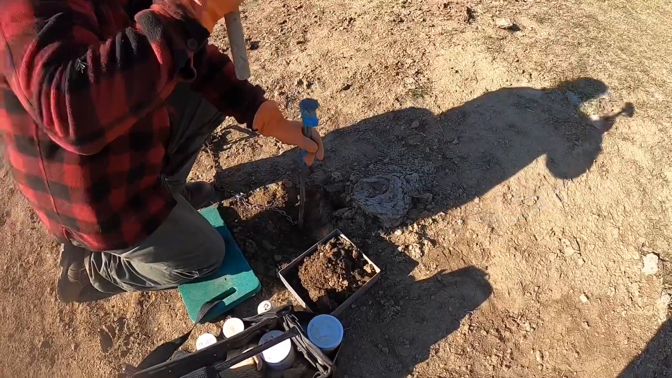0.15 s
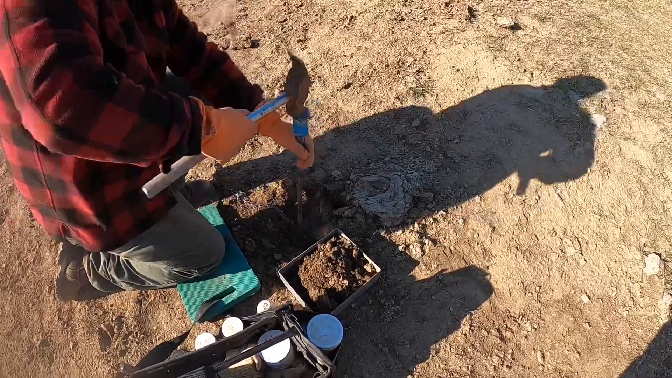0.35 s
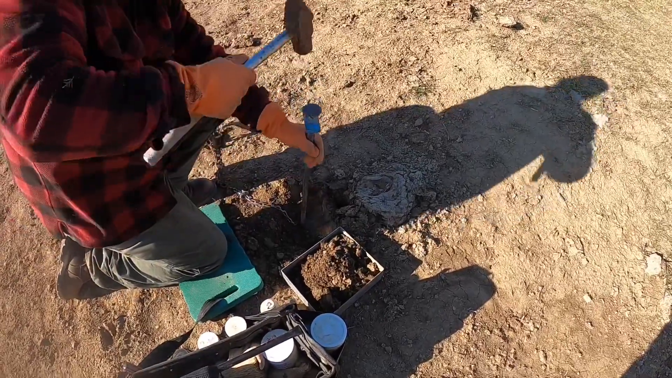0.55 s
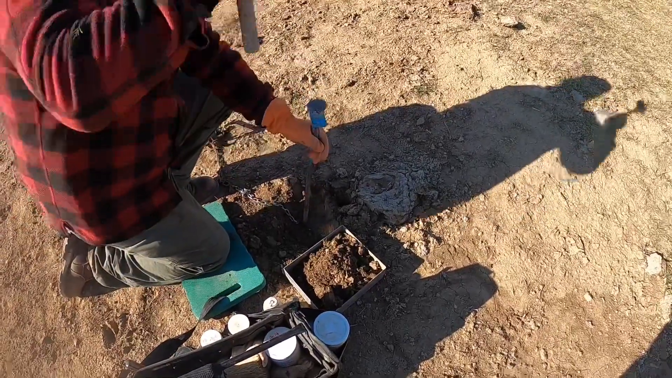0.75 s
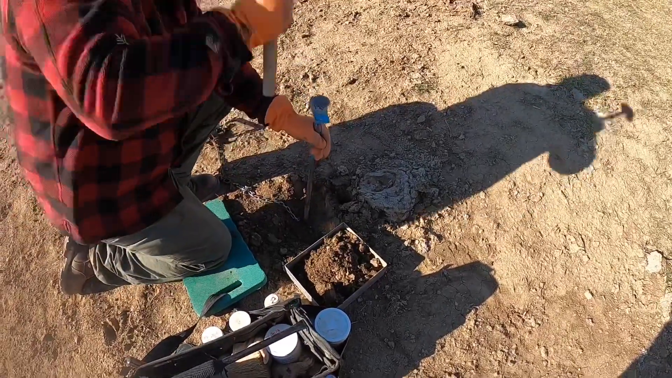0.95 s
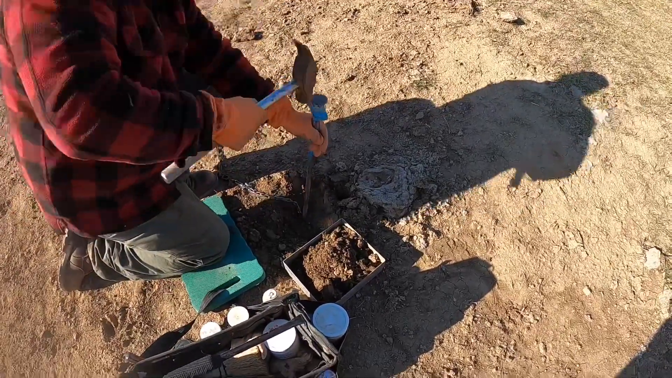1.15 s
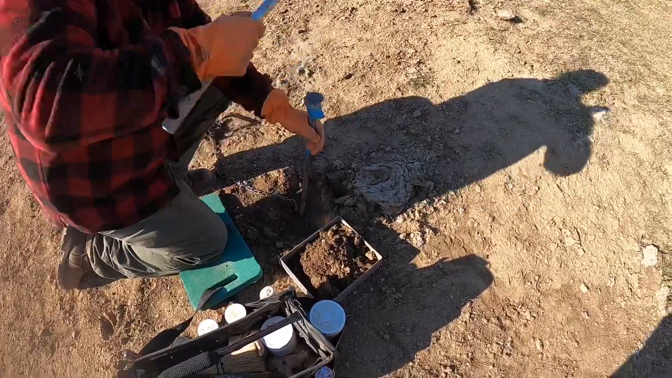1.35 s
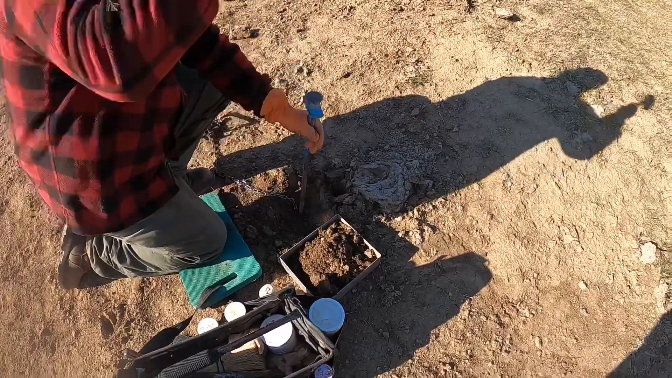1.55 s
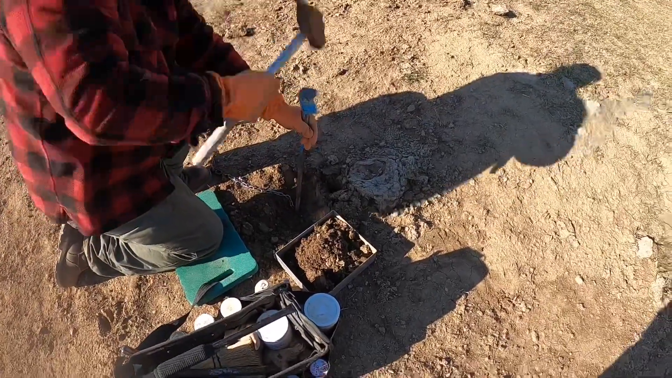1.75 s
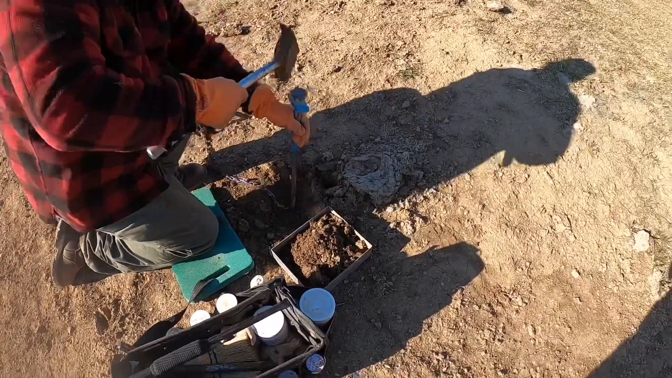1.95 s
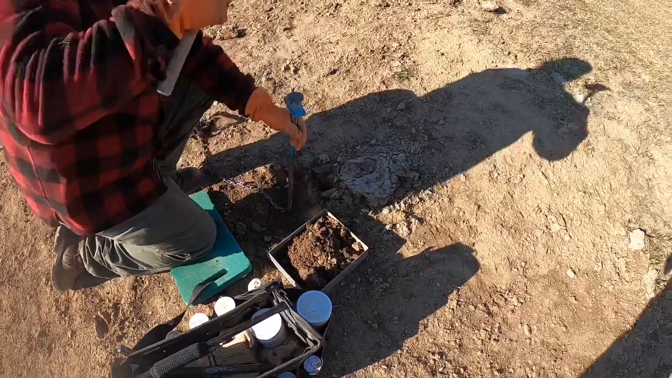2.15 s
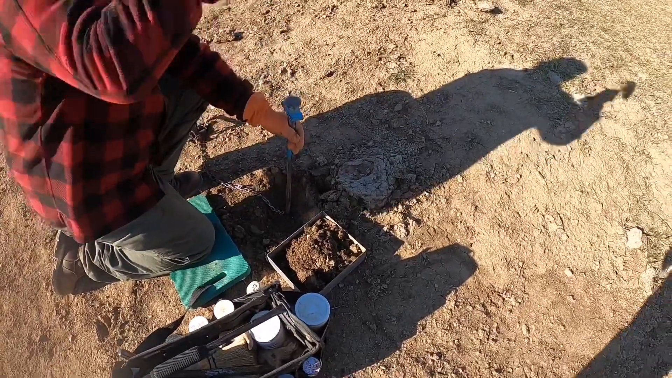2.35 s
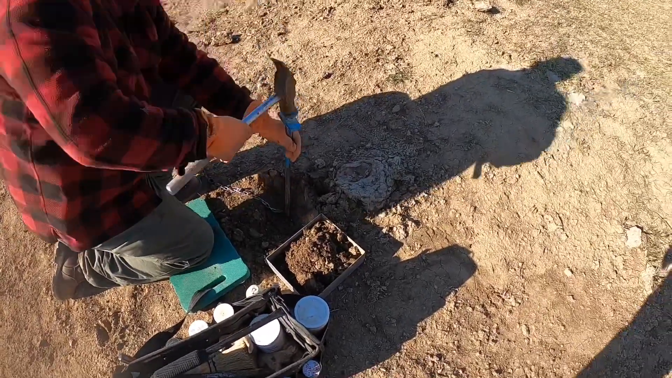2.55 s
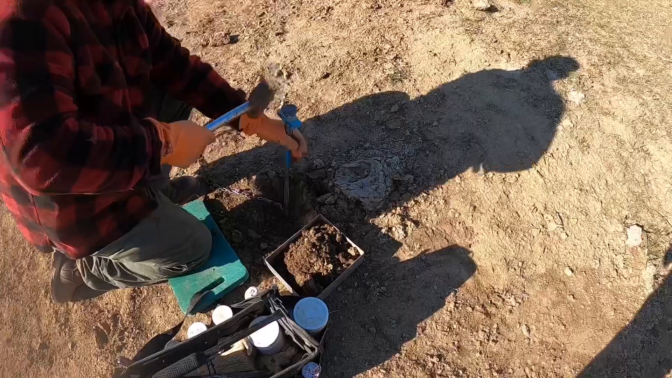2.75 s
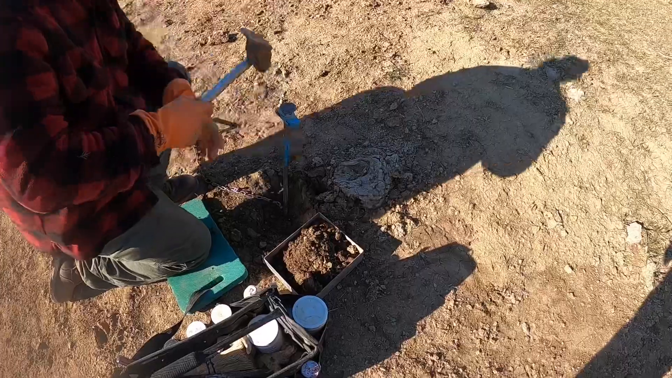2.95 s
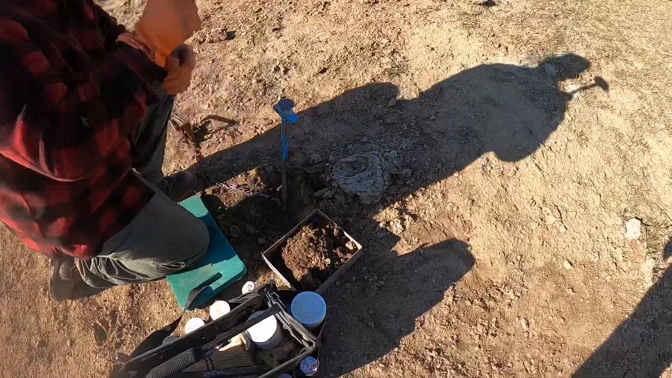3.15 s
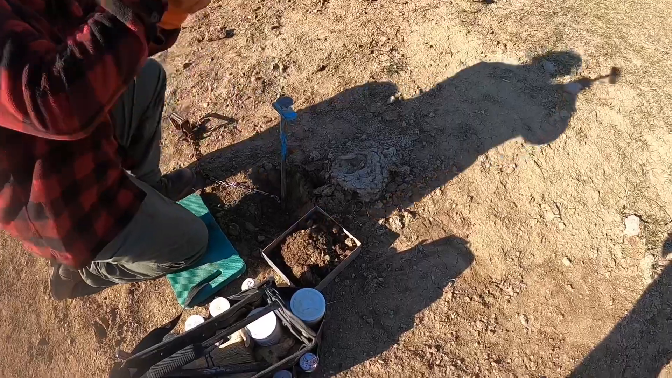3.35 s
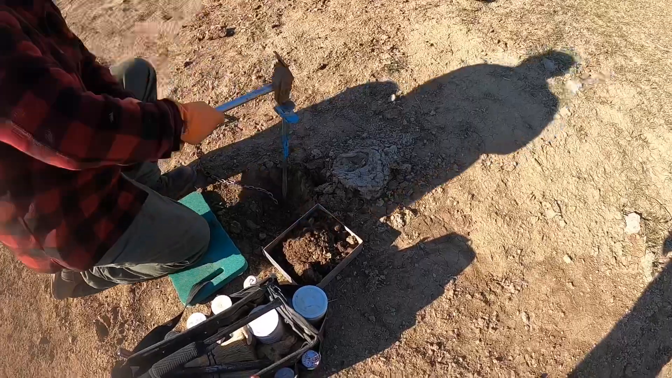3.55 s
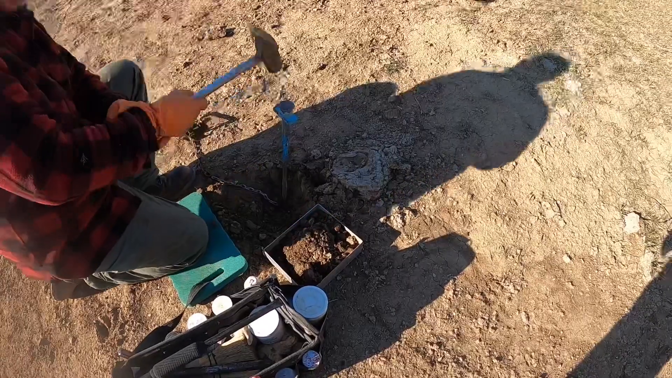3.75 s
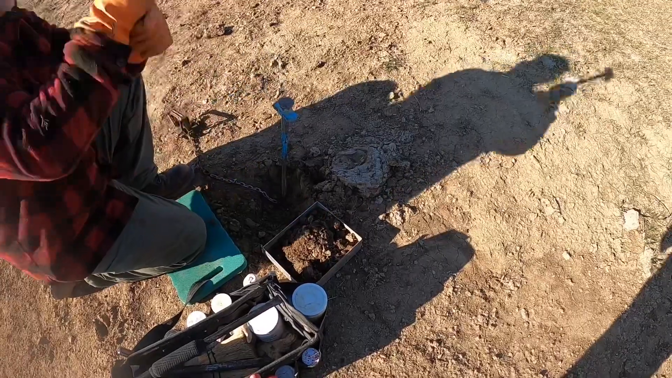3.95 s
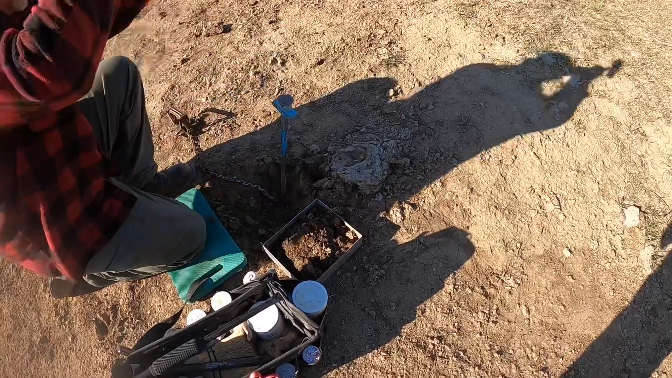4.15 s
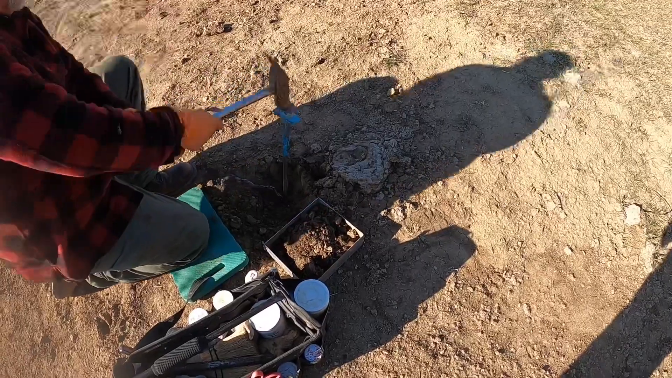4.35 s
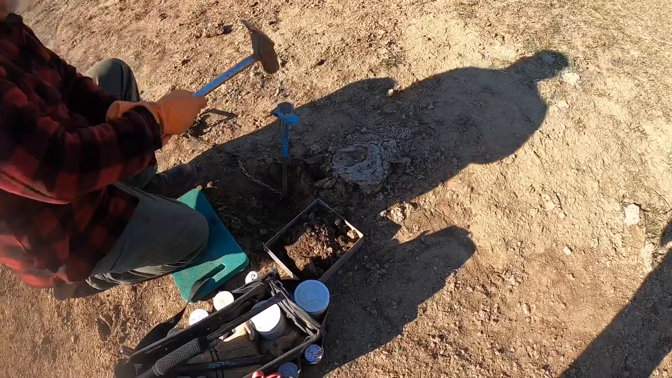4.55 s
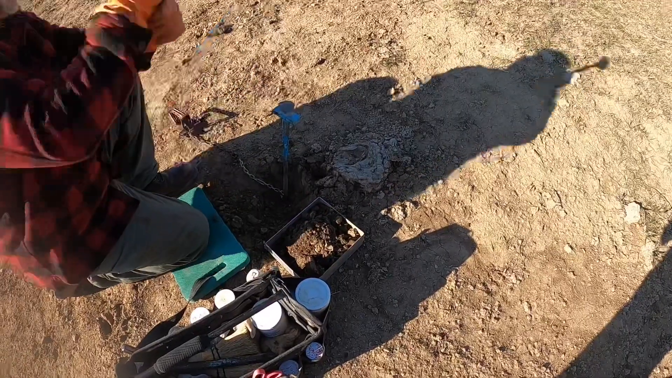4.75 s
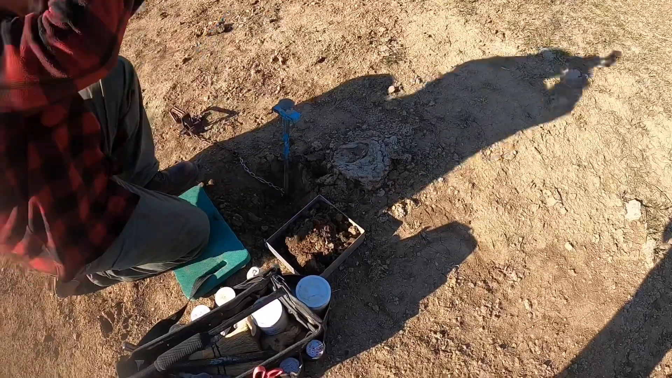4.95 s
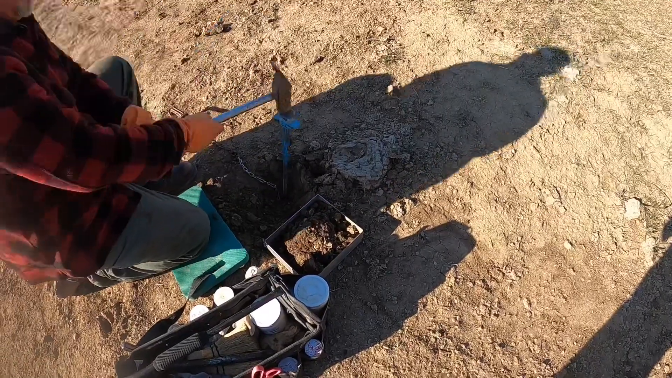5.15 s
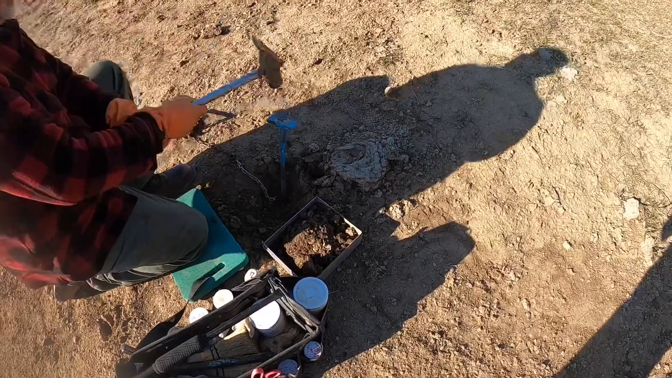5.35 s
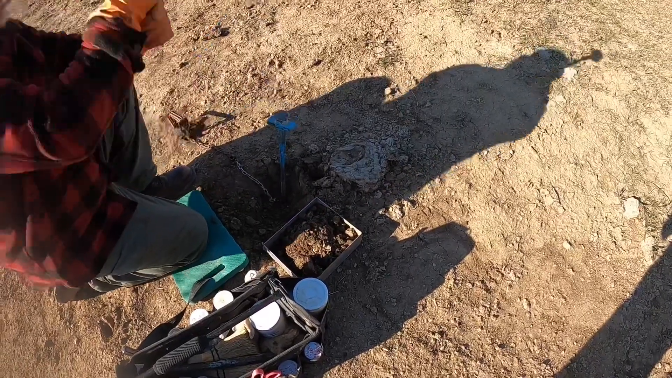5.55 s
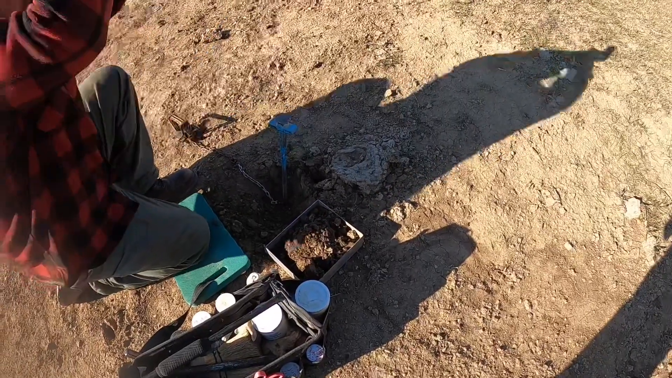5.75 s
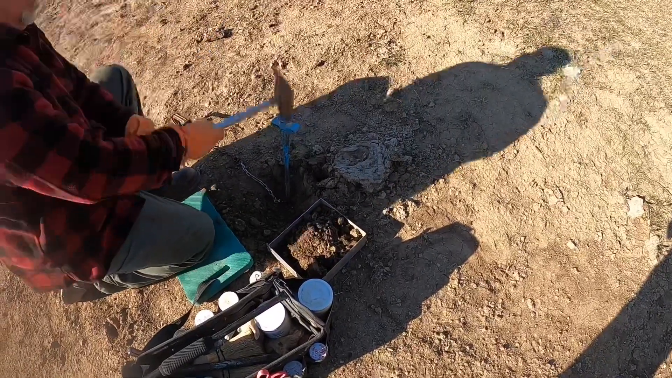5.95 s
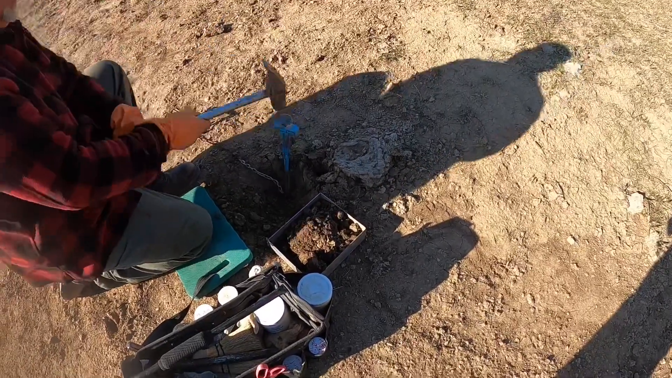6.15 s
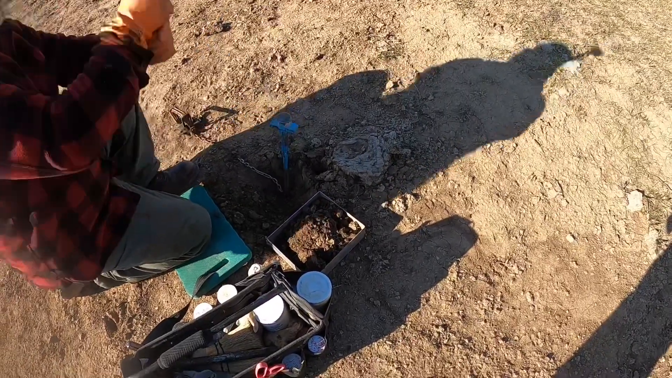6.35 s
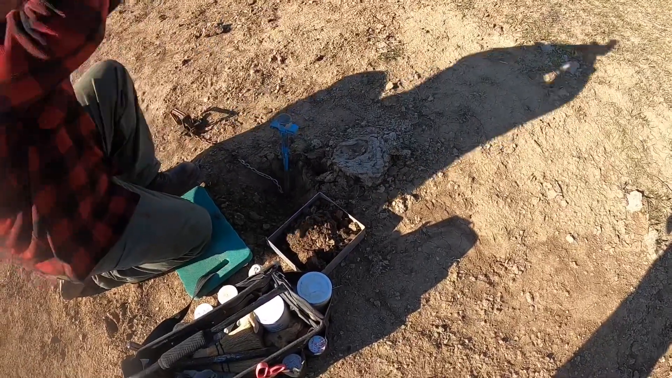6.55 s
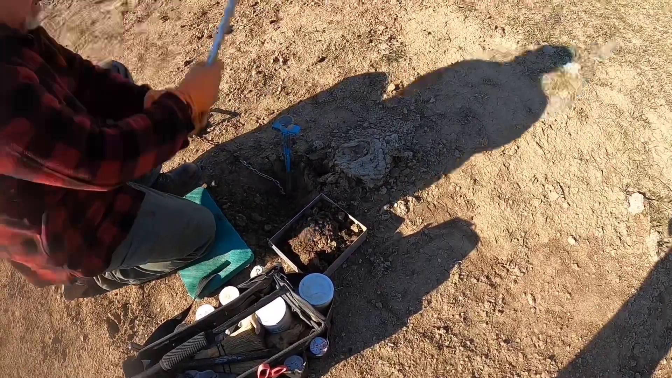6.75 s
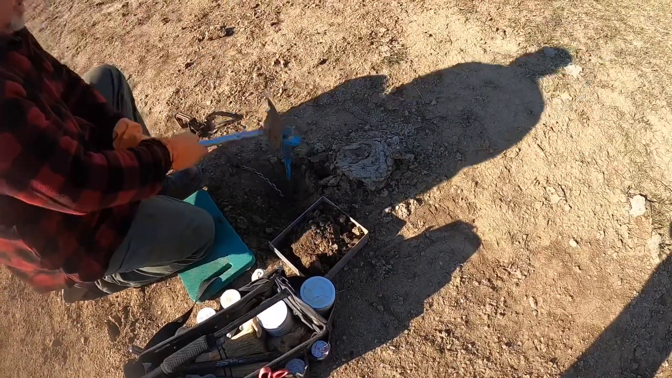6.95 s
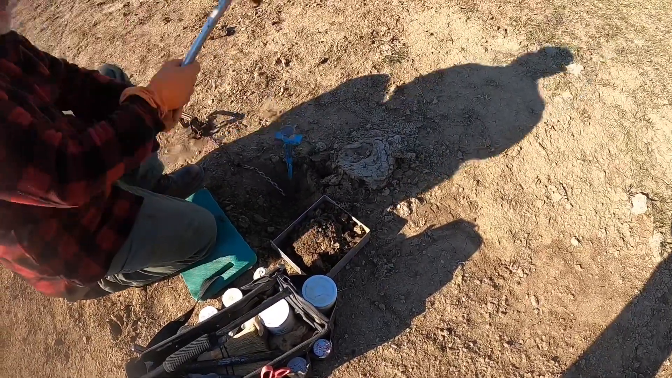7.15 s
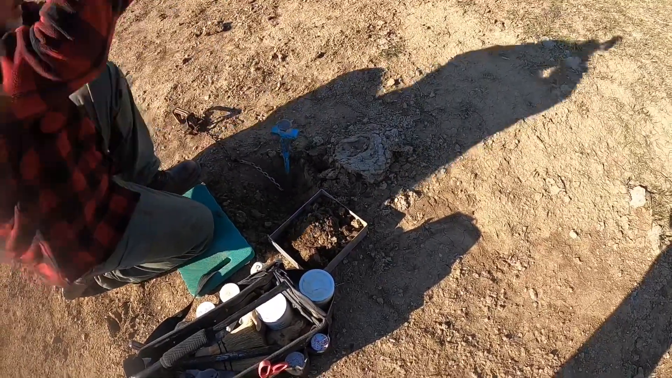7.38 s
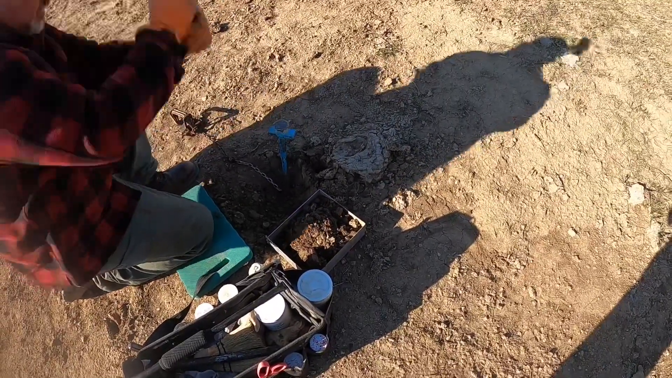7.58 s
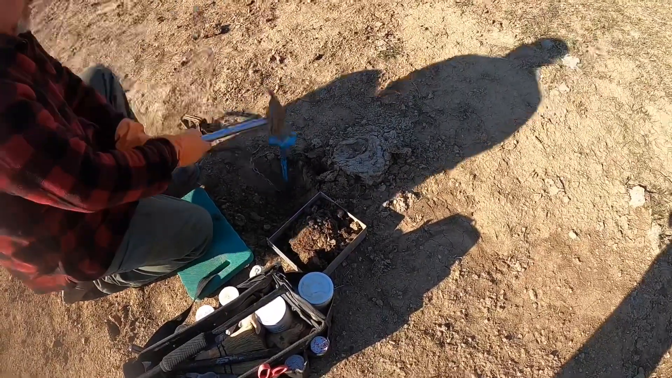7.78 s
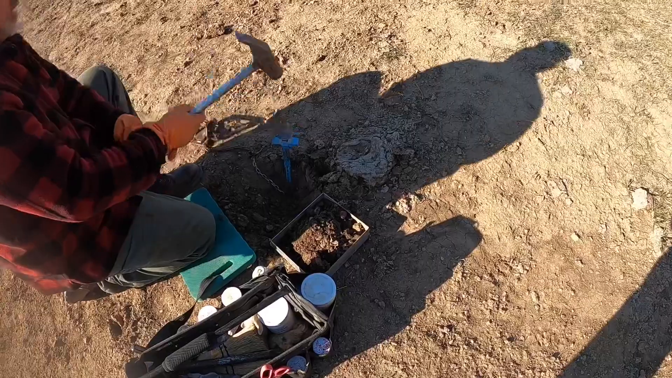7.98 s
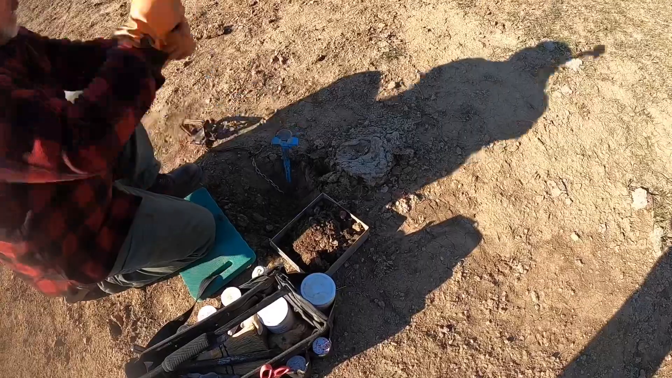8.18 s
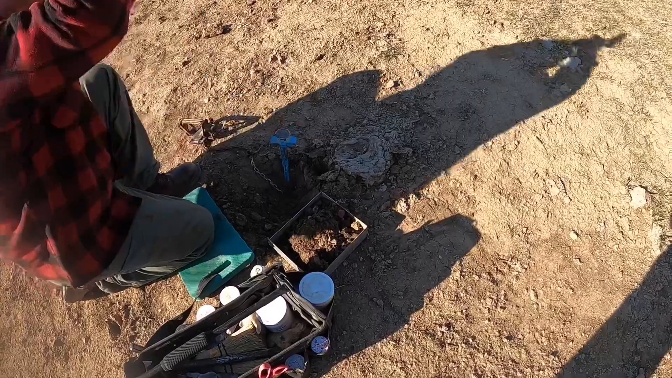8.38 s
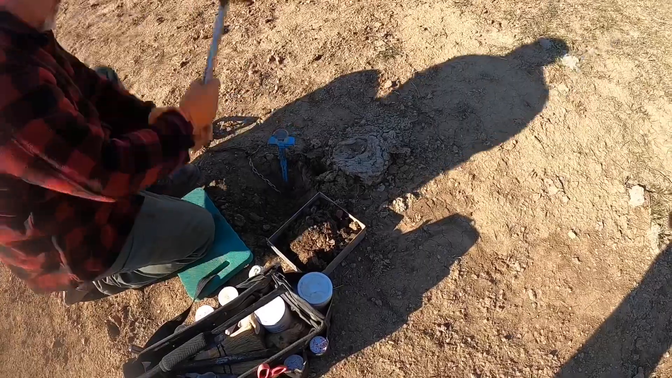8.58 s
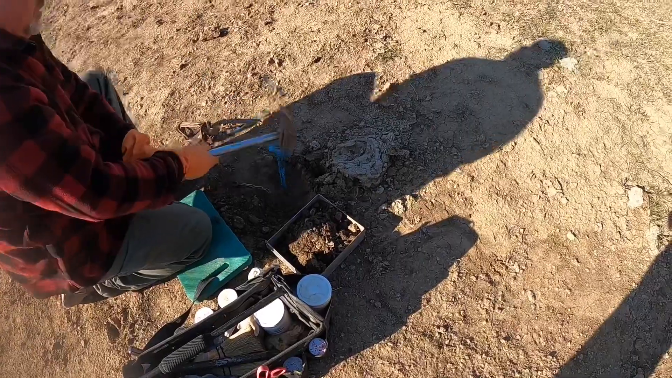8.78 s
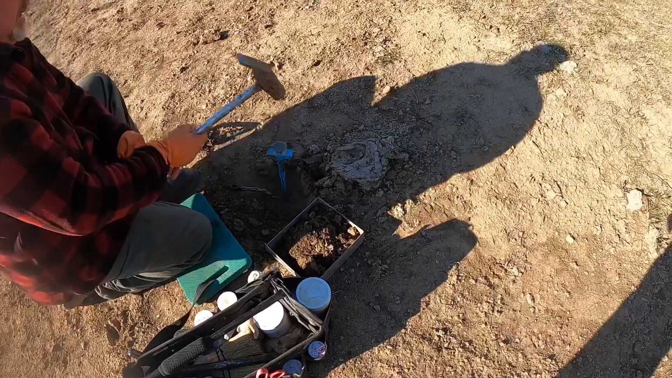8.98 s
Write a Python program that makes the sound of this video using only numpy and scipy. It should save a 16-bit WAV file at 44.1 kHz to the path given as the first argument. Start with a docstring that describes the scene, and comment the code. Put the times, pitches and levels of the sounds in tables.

```python
"""A steel hammer drives a metal stake into dry ground on a windy day, heard by one close microphone.
From the start, wind hisses in far grass and its eddies rumble and buffet on the microphone; sleeves rustle.
A short fizz swells just before each crack. At each of eleven blows steel cracks on steel and excites the
modes of stake and hammer head. Echoes return from far objects, the gain ducks the treble, and grit falls
back while the head sings on at a high pitch. In the later blows the ground damps the stake much sooner."""
import sys
import numpy as np
from scipy import signal
from scipy.fft import rfft, irfft
from scipy.io import wavfile
from scipy.ndimage import uniform_filter1d

SR = 44100
rng = np.random.default_rng(int(sys.argv[2]) if len(sys.argv) > 2 else 0)


def dump(signal):
    """Clip the signal to [-1, 1] and save it as 16-bit WAV at the path in sys.argv[1]."""
    limited = np.clip(np.atleast_2d(signal).T, -1, 1)
    pcm = np.round(limited * 32767).astype(np.int16)
    wavfile.write(sys.argv[1], SR, pcm)


N = 397782

# Noise spectra of wind in grass, cloth and four kinds of eddy noise: frequency_hz, relative_density_db
GRASS_SPECTRUM = [(530, -32.5), (900, -3.5), (1520, -19), (2210, -6.5), (3370, -10), (6340, -18.5),
                  (8190, -22.5), (9500, -49.5), (12400, -75.5), (20900, -120)]
CLOTH_SPECTRUM = [(800, -10.5), (1500, 0), (3000, 2.5), (5000, -3), (8000, -13.5), (9500, -17),
                  (10500, -58.5)]
RUMBLE_SPECTRUM = [(8.8, -40.5), (15, -8), (43, 3), (75, 3.5), (203, -6.5), (300, -19.5), (390, -39.5),
                   (660, -120)]
FLUTTER_SPECTRUM = [(60, -16), (130, -1.5), (250, -3.5), (420, -10), (800, -29), (1600, -79.5)]
BUFFET_SPECTRUM = [(200, -8.5), (420, -4.5), (800, -8.5), (1500, -23), (3000, -57.5), (5000, -73.5)]
TEAR_SPECTRUM = [(500, -11), (1000, -5), (2000, -10.5), (3500, -28.5), (5000, -44), (7000, -72.5)]
# Sleeves brushing: centre_s, half_width_s, level_db
SLEEVE_BRUSHES = [(0.16, 0.058, -58.5), (0.87, .02, -55.5), (0.945, 0.016, -57), (1.654, 0.11, -56),
                  (3.166, 0.032, -56.5), (3.3, 0.04, -59.5), (3.466, 0.047, -58.5), (4.084, 0.083, -65),
                  (4.95, 0.14, -73), (5.622, 0.059, -60), (6.63, .06, -63), (7.497, 0.035, -71.5),
                  (8.1, 0.046, -67)]
# Grit and clods falling back: start_s, level_db, pitch_hz
GRIT_FALLS = [(1.135, -50, 1520), (1.14, -52, 1990), (1.388, -66, 3330), (2.683, -58, 1730),
              (3.65, -45, 1320), (4.45, -52, 1095), (4.494, -52, 2020), (5.224, -40, 1520),
              (5.82, -63, 3000), (6.064, -46, 1470), (6.10, -52, 1780), (6.888, -49.5, 1600),
              (7.78, -54, 1700), (7.815, -49.5, 2200), (7.978, -60.5, 2720), (8.084, -58.5, 3750),
              (8.72, -51, 1500)]
# Course of the wind's rumble on the microphone: time_s, level_db
RUMBLE_LEVELS = [(0.0, -12.5), (0.15, -23.5), (1.0, -20), (1.36, -29), (1.5, -17), (2.96, -32.5),
                 (3.44, -22.5), (3.87, -26.5), (3.94, -24), (5.22, -21), (5.83, -31), (5.9, -21.5),
                 (6.51, -26.5), (6.61, -21.5), (6.71, -26.5), (6.78, -22), (7.06, -30), (7.61, -26),
                 (7.71, -18.5), (7.79, -33.5), (7.99, -26), (9.02, -26.5)]
# Gusts: centre_s, hold_s, buffet_level_db, brightness_db
WIND_GUSTS = [(0.04, 0.23, -43, -8), (0.62, 0.051, -59, 2), (0.84, 0.1, -39.5, 3), (0.985, 0.059, -35, 0),
              (1.29, 0.038, -48, -8), (1.529, 0.13, -32, 4), (1.724, 0.16, -40, -6.5), (1.95, 0.1, -51, -2),
              (2.073, 0.079, -42, -6), (2.34, 0.065, -73, -3), (2.54, 0.034, -57, -1),
              (2.88, 0.05, -59.5, -2), (3.06, 0.019, -51, 0), (3.24, .12, -44, -3),
              (3.46, 0.097, -39.5, -4), (3.78, 0.052, -48, -6), (4.1, 0.25, -38.5, 6.5),
              (4.31, 0.055, -44, 3.5), (4.77, 0.35, -34.5, -2), (5.08, 0.1, -43.5, -3),
              (5.27, 0.085, -41.5, 11), (5.47, 0.079, -39, -7), (5.91, 0.021, -44, -3),
              (6.12, 0.028, -46.5, 5), (6.273, 0.1, -52, -5.5), (6.38, .05, -43.5, -7),
              (6.544, 0.086, -45, -1), (6.628, 0.077, -38, 16), (6.795, 0.08, -45, 11),
              (7.119, 0.057, -47, -10.5), (7.313, 0.027, -44, -4.5), (7.403, 0.039, -41.5, 10),
              (7.513, 0.056, -38, 6), (7.66, 0.047, -42, -2), (8.06, 0.16, -46.5, -5),
              (8.2, 0.13, -44, -17), (8.52, 0.15, -54, 2), (8.66, .05, -49.5, 1), (8.98, 0.04, -47.5, -2)]
# The strongest puffs on the microphone: time_s, level_db
STRONG_PUFFS = [(0.835, -36), (0.976, -35), (1.451, -33.5), (1.508, -32), (1.535, -30), (1.554, -27),
                (1.619, -35), (3.43, -41), (4.089, -38.5), (4.23, -42), (4.648, -39), (4.724, -34.5),
                (4.834, -39), (6.376, -39.5), (6.533, -42.5), (6.557, -42), (6.594, -40), (7.313, -43),
                (7.385, -38), (7.494, -43.5), (8.017, -44), (8.148, -40.5), (8.978, -42.5)]
# Noise bands of the echoes, the fizz and the steel-on-steel contact: centre_hz, width_hz, gain_db
ECHO_BANDS = [(1620, 220, -16), (2200, 67, 0.5), (3320, 150, 3), (3900, 40, -2.5), (4240, 79, 2.5),
              (3020, 1200, -10.5), (6250, 39, -5.5), (7400, 65, -17)]
FIZZ_BANDS = [(970, 240, -10.5), (1550, 600, -12.5), (1880, 190, -10), (2280, 240, -0.5), (3090, 250, -4.5),
              (3420, 100, -0.5), (3520, 110, 2.5), (4244, 150, -2.5), (5230, 630, -15.5), (6240, 280, 0),
              (6670, 99, -7), (7190, 150, -6.5), (8020, 300, -12.5), (9400, 600, -21), (10900, 1500, -35),
              (13000, 3000, -47.5)]
CRACK_BANDS = [(1130, 70, -21), (2300, 270, -14), (3365, 900, 12), (3750, 1450, 7), (5900, 500, -21),
               (8540, 620, -9.5), (12400, 2800, -26)]
# Normal modes of the hammer head and of the free stake: pitch_hz, level_db, t60_s
HEAD_MODES = [(7945, 0, 1.5), (7925, -5, 1.0), (7963, -10, .8)]
STAKE_MODES = [(990, -16, .09), (2233, -5, .22), (2681, -17, .1), (3345, -8, .5), (3885, -13, .23),
               (4185, -5, .07), (6250, -6, .04), (6417, -4, .047), (7180, -19, .1), (8680, -21, .045),
               (9016, -36, .3), (10630, -36, .054), (11300, -32, .067)]
# Blows: impact_s, crack_db, fizz_db, stake_db, tilt_db_per_octave, ground_damping_db_per_s, head_db
HAMMER_BLOWS = [(0.3479, -2, -19.5, -18.5, 2, 10.5, -28), (1.0737, 0.5, -20, -12.5, -3, 41, -45),
                (1.8138, -2, -20.5, -14.5, 0.5, 18, -38), (2.5772, -4.5, -16.5, -11.5, -0.5, 22, -41),
                (3.5824, 3, -20, -18.5, 4.5, 202, -44.5), (4.375, -2, -18, -14.5, 0.5, 223.5, -46),
                (5.1724, 0.5, -19.5, -17, -0.5, 483.5, -50.5), (5.9877, -3.5, -22, -13, -4, 794, -33),
                (6.8223, -3, -18, -13.5, 2.5, 905, -41.5), (7.7019, 0, -21, -12, 2, 893, -40),
                (8.661, -3, -21.5, -12, 0, 894, -34)]

CALM_DB, REFERENCE_GUST_DB = -66, -35
GUST_RISE_DB_PER_S, GUST_FALL_DB_PER_S = 247.5, 200.5
SMALL_PUFFS_PER_S, FIZZ_LEAD_S, ECHO_DELAY_S = 12, 0.042, 0.026
DUCK_SPLIT_HZ, DUCK_ABOVE_DB, DUCK_RATIO = 250, -22.5, 0.42
DUCK_ATTACK_S, HOLD_FALL_DB_PER_S = 0.0043, 171


def from_db(db):
    """Amplitude ratio of a level in decibels."""
    return 10 ** (np.asarray(db) / 20)


def rms_one(x):
    """Normalisation to unit rms."""
    return x / np.sqrt(np.mean(x ** 2) + 1e-20)


def drift(corner_hz):
    """Low-pass filtered noise: a slow random fluctuation of unit rms."""
    pole = np.exp(-20 * np.pi * corner_hz / SR)  # at a tenth of the sample rate
    slow = signal.lfilter([1], [1, -2 * pole, pole * pole], rng.standard_normal(N // 10 + 4002))[4000:]
    return np.interp(np.arange(N) / 10, np.arange(len(slow)), rms_one(slow))


def wander(t, points_per_s):
    """Linear interpolation between random values over one second."""
    return np.interp(t, np.arange(points_per_s + 1) / points_per_s, rng.standard_normal(points_per_s + 1))


def shaped_noise(spectrum, modulation_db=0):
    """Amplitude-modulated white noise, filtered to a spectrum and scaled to unit rms."""
    noise = rng.standard_normal(N) * from_db(modulation_db)
    bin_hz = np.arange(1, N // 2 + 2) * SR / N
    hz, density_db = np.transpose(spectrum)
    gain = from_db(np.interp(np.log(bin_hz), np.log(hz), density_db, left=-80))
    return rms_one(irfft(rfft(noise) * gain, N))


def resonances(x, bands):
    """Forced response of two-pole resonators in parallel, summed with alternating signs."""
    out = 0
    for k, (hz, width_hz, gain_db) in enumerate(bands):
        r = np.exp(-np.pi * width_hz / SR)
        poles = [1, -2 * r * np.cos(2 * np.pi * hz / SR), r * r]
        out += (-1) ** k * from_db(gain_db) * signal.lfilter([(1 - r * r) / 2, 0, (r * r - 1) / 2], poles, x)
    return out


def steep_band(x, hz, width_hz, gain_db=0):
    """Two like resonators in cascade give a band with steeper skirts."""
    return resonances(resonances(x, [(hz, width_hz, gain_db)]), [(hz, width_hz, 0)])


def free_vibration(modes, t, tilt_db=0, damping_db_per_s=0):
    """Superposition of damped modes, unevenly excited; added damping takes most from the low ones."""
    hz, level_db, t60_s = np.transpose(modes)[:, :, None]
    level_db = level_db + 1.5 * rng.standard_normal(hz.shape) + tilt_db * np.log2(hz / 3300)
    decay_db_per_s = 60 / t60_s + damping_db_per_s * (3300 / hz) ** 1.1
    return np.sum(from_db(level_db - decay_db_per_s * t) * np.sin(2 * np.pi * hz * t), axis=0)


def add(out, start_s, sound):
    """Superposition of a sound on the mix from start_s on."""
    i = round(start_s * SR)
    out[i:i + len(sound)] += sound[:N - i]


def grass_hiss():
    """Turbulent flow through far grass radiates a faint, nearly steady broadband noise."""
    return from_db(-67.5 + 2 * drift(3.1)) * shaped_noise(GRASS_SPECTRUM)


def sleeve_rustle():
    """Sliding friction of cloth makes grainy noise that swells and fades with each brush."""
    t = np.arange(N) / SR
    envelope = sum(from_db(level_db) * np.exp(-((t - centre_s) / half_width_s) ** 2)
                   for centre_s, half_width_s, level_db in SLEEVE_BRUSHES)
    return envelope * shaped_noise(CLOTH_SPECTRUM, 4.5 * drift(40))


def falling_grit():
    """Small impacts of grit and clods: each is a transient of narrow-band noise."""
    out, t = np.zeros(N), np.arange(SR // 20) / SR
    envelope = t / 0.006 * np.exp(1 - t / 0.006)  # peaks at 6 ms
    for start_s, level_db, pitch_hz in GRIT_FALLS:
        tick = rms_one(steep_band(rng.standard_normal(len(t)), pitch_hz, width_hz=250))
        add(out, start_s, from_db(level_db) * envelope * tick)
    return out


def gust_levels(t):
    """Upper envelope of gusts that rise, hold and fall: level and brightness of the strongest, in dB."""
    strongest_db, brightness_db = np.full(len(t), float(CALM_DB)), np.zeros(len(t))
    for centre_s, hold_s, level_db, bright_db in WIND_GUSTS:
        early_s = np.maximum(centre_s - hold_s / 2 - t, 0)
        late_s = np.maximum(t - centre_s - hold_s / 2, 0)
        gust_db = level_db - GUST_RISE_DB_PER_S * early_s - GUST_FALL_DB_PER_S * late_s
        brightness_db = np.where(gust_db > strongest_db, bright_db, brightness_db)
        strongest_db = np.maximum(strongest_db, gust_db)
    return strongest_db, brightness_db


def wind_eddies():
    """Turbulent pressure on the microphone: smooth rumble, lumpy flutter, spiky buffets, a tearing edge."""
    rumble_db = np.interp(np.arange(N) / SR, *np.transpose(RUMBLE_LEVELS))
    gust_db, brightness_db = np.repeat(gust_levels(np.arange(0, N, 32) / SR), 32, axis=1)[:, :N]
    gust_db = uniform_filter1d(gust_db, size=64) + drift(6.7)  # the wind wavers within a gust
    excess_db = gust_db - REFERENCE_GUST_DB
    tear_db = -52.5 + uniform_filter1d(brightness_db, size=400) + 1.5 * excess_db  # outgrows the gust
    rumble = from_db(rumble_db) * shaped_noise(RUMBLE_SPECTRUM, 0.5 * drift(5))
    eddy = drift(23)  # one eddy shakes the three upper layers together
    flutter = from_db(-23 + 0.67 * excess_db) * shaped_noise(FLUTTER_SPECTRUM, 2.8 * eddy)
    buffets = from_db(gust_db) * shaped_noise(BUFFET_SPECTRUM, 3.5 * eddy + 3.5 * drift(100))
    tearing = from_db(tear_db) * shaped_noise(TEAR_SPECTRUM, 2 * eddy + 3.2 * drift(120))
    return rumble + flutter + buffets + tearing


def wind_puffs():
    """Pressure transients on the microphone, each a noise burst with a dull body and a brighter edge."""
    out, t = np.zeros(N), np.arange(SR // 25) / SR
    body_band = signal.butter(4, [350, 1000], "band", fs=SR, output="sos")
    edge_band = signal.butter(3, [900, 2300], "band", fs=SR, output="sos")
    occurs = rng.random(N // 100 - 10) < SMALL_PUFFS_PER_S * 100 / SR  # one chance per 100 samples
    small_s = 0.01 + np.flatnonzero(occurs) * 100 / SR
    small_db = gust_levels(small_s)[0] - 5
    for time_s, level_db in STRONG_PUFFS + list(zip(small_s, small_db)):
        burst = rng.standard_normal(len(t)) * t / 0.003 * np.exp(1 - t / 0.003)
        body = rms_one(signal.sosfilt(body_band, burst))
        edge = from_db(-17) * rms_one(signal.sosfilt(edge_band, burst))
        add(out, time_s - 0.002, from_db(level_db) * (body + edge))
    return out


def far_echoes(t):
    """Scattering from far objects blurs the stake's tones into noise bands that swell, then die."""
    envelope = (t / 0.081) ** 1.5 * np.exp(-t / 0.054)
    returns = rng.standard_normal(len(t)) * from_db(5 * wander(t, 50))  # they arrive in clumps
    bands = [(hz, width_hz, gain_db + 3 * rng.standard_normal()) for hz, width_hz, gain_db in ECHO_BANDS]
    return envelope * resonances(returns, bands)


def short_fizz():
    """Band-filtered noise, coloured anew each time, swells just before a crack and fades just after."""
    t = np.arange(SR // 8) / SR
    rise = np.sin(np.pi / 2 * t / FIZZ_LEAD_S) ** 2
    fall = 0.5 * np.exp(-((t - FIZZ_LEAD_S) / 0.011) ** 2)
    bands = [(hz, width_hz, gain_db + 4.5 * rng.standard_normal()) for hz, width_hz, gain_db in FIZZ_BANDS]
    noise = rng.standard_normal(len(t))
    sharp = rms_one(sum(steep_band(noise, *band) for band in bands))
    blurred = from_db(-9) * rms_one(resonances(noise, bands))
    return np.where(t < FIZZ_LEAD_S, rise, fall) * rms_one(sharp + blurred)


def head_ring(t):
    """Close modes of the hammer head beat as it rebounds, turns in the air and swings away."""
    rebound = 1 - np.exp(-t / 0.03)
    turning = from_db(3.5 * wander(t, 25))
    receding = np.exp(-(t / 0.33) ** 2)
    return rebound * turning * receding * free_vibration(HEAD_MODES, t)


def stake_ring(t, tilt_db, ground_damping):
    """The struck stake vibrates in inharmonic modes that lose energy to the ground."""
    return free_vibration(STAKE_MODES, t, tilt_db, ground_damping)


def contact_crack(t):
    """An impulse and the brief chatter of the steel faces excite broad resonances."""
    envelope = from_db(-60 * t / 0.011) + from_db(-15.5 - 60 * t / 0.035)  # t60 of 11 ms and 35 ms
    force = rng.standard_normal(len(t)) * envelope
    force[:3] = [2, 3, 2]  # the click of first contact
    return resonances(force, CRACK_BANDS)


def hammer_blows():
    """A short fizz swells just before each crack; each impact gives a crack, ringing and echoes."""
    out, t = np.zeros(N), np.arange(SR) / SR
    for impact_s, crack_db, fizz_db, stake_db, tilt_db, ground_damping, head_db in HAMMER_BLOWS:
        add(out, impact_s - FIZZ_LEAD_S, from_db(fizz_db) * short_fizz())
        add(out, impact_s, from_db(crack_db) * contact_crack(t))
        add(out, impact_s, from_db(stake_db) * stake_ring(t, tilt_db, ground_damping))
        add(out, impact_s, from_db(head_db) * head_ring(t))
        add(out, impact_s + ECHO_DELAY_S, from_db(-29) * far_echoes(t))
    return out


def scene():
    """Sound pressures add linearly at one microphone, which feeds both channels."""
    background = grass_hiss() + sleeve_rustle() + falling_grit() + wind_eddies() + wind_puffs()
    return np.tile(background + hammer_blows(), (2, 1))


def record(dry):
    """Split-band compression: a loud treble peak briefly ducks everything above the rumble."""
    low = signal.sosfiltfilt(signal.butter(2, DUCK_SPLIT_HZ, fs=SR, output="sos"), dry[0])
    high = dry[0] - low
    treble = signal.sosfilt(signal.butter(2, 1500, "high", fs=SR, output="sos"), high)
    over_db = np.maximum(20 * np.log10(np.abs(treble) + 1e-9) - DUCK_ABOVE_DB, 0)
    ramp_db = HOLD_FALL_DB_PER_S * np.arange(N) / SR
    held_db = np.maximum.accumulate(over_db + ramp_db) - ramp_db  # peak hold with a steady fall
    pole = np.exp(-1 / (DUCK_ATTACK_S * SR))
    duck_db = DUCK_RATIO * signal.lfilter([1 - pole], [1, -pole], held_db)
    ducked = low + high * from_db(-np.roll(duck_db, SR // 25))  # the gain acts 40 ms late
    dull = signal.sosfilt(signal.butter(1, 10000, fs=SR, output="sos"), ducked)  # the capsule rolls off
    rounded = dull / (1 + dull ** 6) ** (1 / 6)  # full scale rounds the highest peaks
    band_limit = signal.cheby2(12, 70, 15750, fs=SR, output="sos")
    return np.tile(signal.sosfilt(band_limit, rounded), (2, 1))


dry = scene()
out = record(dry)
dump(out)
```